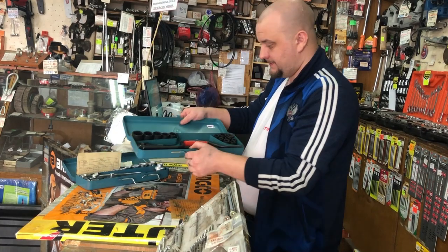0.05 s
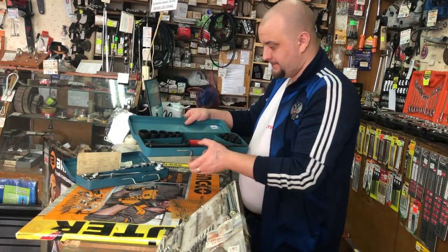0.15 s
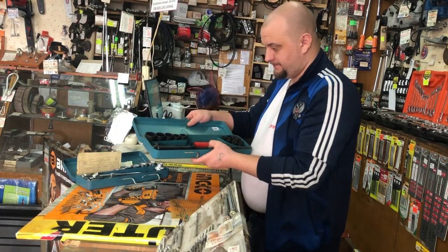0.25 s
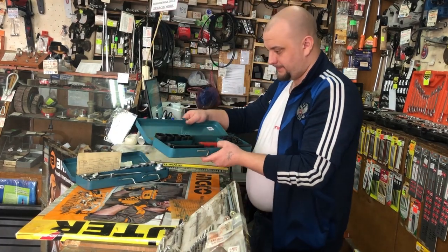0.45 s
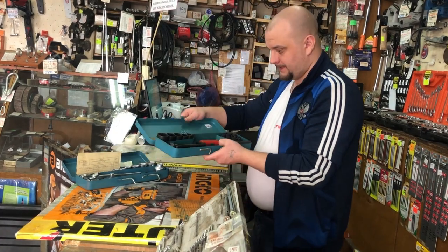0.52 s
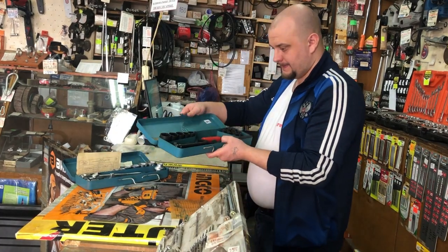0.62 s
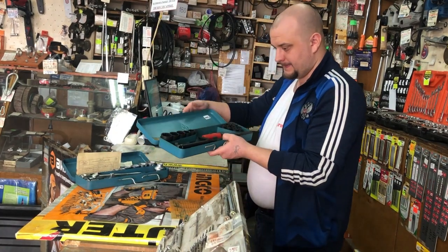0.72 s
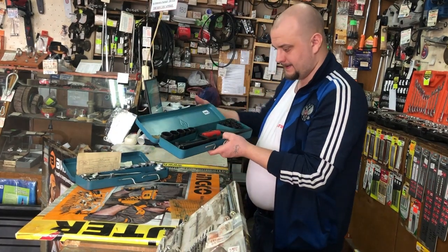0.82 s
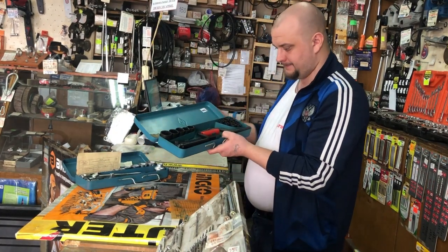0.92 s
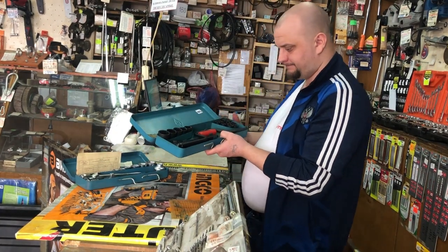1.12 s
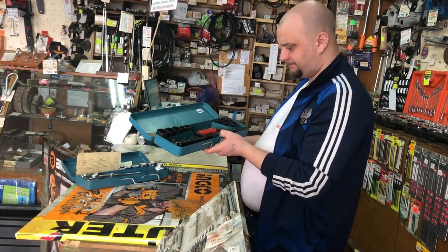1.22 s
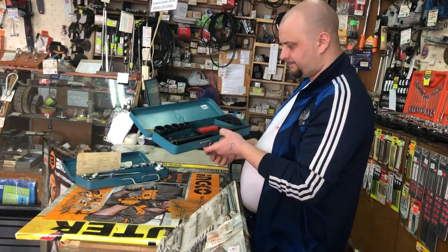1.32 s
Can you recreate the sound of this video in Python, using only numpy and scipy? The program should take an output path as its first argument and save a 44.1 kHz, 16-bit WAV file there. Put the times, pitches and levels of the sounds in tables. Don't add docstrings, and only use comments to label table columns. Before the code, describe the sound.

Loose steel tools snap sharply twice in a plastic case, ringing briefly through a small shop.

```python
import sys
import numpy as np
from scipy import signal
from scipy.fft import rfft, irfft
from scipy.io import wavfile
from scipy.ndimage import map_coordinates

SR = 44100
rng = np.random.default_rng(int(sys.argv[2]) if len(sys.argv) > 2 else 0)


def volts(x):
    e = np.asarray(x, float) / 20
    return 10 ** e


def unload_wav(signal):
    wavfile.write(
        sys.argv[1],
        SR,
        np.round(np.clip(np.atleast_2d(signal).T, -1, 1) * 32767).astype(np.int16),
    )


N = 59535

# pitch_hz, level_db (per Hz)
EARLIER_COLOUR = [(120, -35.5), (200, -14), (430, -4.5), (534, -15), (1130, -14.5), (1650, -7.5),
                  (1810, -13), (3750, -14), (15500, -38.5)]
EARLIER_DB, EARLIER_T60_SCALE = -48.5, 1.5
# pitch_hz, level_db (per Hz)
FLOOR_COLOUR = [(18, -30), (30, -8.5), (353, -4.5), (566, -12), (1120, -11.5), (1310, -16.5), (1990, -16),
                (3190, -21), (15800, -34)]
# time_s, level_db
BUSTLE = [
    (0.52, -61.5),
    (0.732, -62),
    (0.98, -65),
    (1.248, -67.5),
    (1.35, -71.5),
]
FLOOR_DB, BUSTLE_FULL_HZ, PATCHY_DB = -62, 1520, -1
# pitch_hz, level_db (rms), wobble_db
HUM = [(49.3, -70.5, -2.4), (99, -77.5, 4.5), (169.9, -73.5, 0), (236.7, -75.5, 1.5), (365.3, -74.5, 3.5),
       (398, -77.5, 1), (1137, -78.5, 3), (1980, -84.5, 5)]
# start_s, peak_db, pitch_hz, t60_s, click_db
TICKS = [(.02, -48, 530, .08, -70), (.107, -56, 4900, .01, -64), (.2196, -46, 4520, .018, -60),
         (.2915, -38, 4500, .014, -55), (.318, -39, 760, .04, -70), (.322, -46, 560, .09, -80),
         (.445, -54, 560, .06, -80), (.495, -57, 3300, .08, -80), (.622, -54, 1750, .04, -80),
         (.628, -58, 2750, .12, -80), (.744, -53, 2200, .02, -60), (.748, -51, 105, .14, -90),
         (.9205, -49, 3650, .007, -49), (.9212, -54, 7000, .009, -70), (.9895, -52, 4350, .008, -53),
         (.993, -56, 2050, .018, -70), (.996, -54, 1380, .022, -70), (1.274, -57, 950, .02, -62),
         (1.297, -64, 15400, .14, -60)]
# start_s, peak_db, chatter_s, tilt_db (per octave)
KNOCKS = [
    (.2194, -34, .0055, -0.7),
    (.2305, -39, .0045, -5.5),
    (.2913, -26, .0065, 2.8),
    (.617, -49.5, .016, -4),
]
# pitch_hz, level_db, t60_s
CASE_MODES = [(818, -15.5, 0.013), (1223, -2.5, 0.042), (1600, -7.5, .018), (1958, -0.1, .022),
              (2560, -5.5, 0.025), (3280, -7.5, .009), (4440, 0, 0.007), (6520, -8, 0.0066),
              (9380, -11.5, .005), (12400, -19, 0.0067), (14120, -17, 0.0047)]
# start_s, peak_db, chatter_s, tilt_db (per octave)
SNAPS = [
    (.2421, -17.5, .0032, -1.1),
    (.3011, -8, .0017, 1.76),
]
# pitch_hz, first_snap_db, second_snap_db, t60_s
STEEL_MODES = [(1328, -14, -13.5, 0.032), (2040, -10, -17, .02), (2930, -6, -6, 0.017),
               (3480, -1.5, -2.5, .014), (4500, -2, -15, .015), (5510, -4.5, -1, 0.0075),
               (6980, -2, -18.5, 0.0067), (9550, -5, -5.5, 0.017), (10100, 4, -7.5, 0.0099),
               (11500, -11.5, -6.5, .007), (12960, -8, 0, 0.01), (13860, -1, 0, 0.017),
               (15720, -3, -7, 0.033)]
TOUCHES, STRENGTH_SPREAD_DB, TOUCH_FADE_DB = 8, 1, 6.5
STEEL_CRACK_DB, CASE_CRACK_DB, CRACK_LOW_HZ, PUSH_DB = 4, -18.5, 810, 2.5
# pitch_hz, t60_s
ROOM_T60 = [(300, 0.37), (790, 0.59), (2090, 0.51), (5510, 0.38), (14600, 0.24)]
# pitch_hz, level_db
ROOM_COLOUR = [(150, -17.5), (400, 0.5), (1000, -1), (2500, -1.34), (5000, 1.6), (7800, -2), (12000, 6),
               (15500, -5)]
ROOM_DB, ROOM_RISE_S, EARLY_DB, EARLY_T60_S = -23, 0.0021, 0, 0.092
RING_IN_ROOM_DB, CASE_IN_ROOM_DB, TICKS_IN_ROOM_DB = -11, -8, -12
# start_s, level_db, t60_s, tilt_db (per octave)
RUBS = [
    (.7425, -56, .16, -4),
    (.768, -63, .2, -2.5),
    (.632, -64, .1, -4),
    (.987, -62, .1, -5),
]
# centre_s, all_kept_below_hz, then three kept bands, each kept_hz
THIN_MOMENTS = [(.086, 2700, 4650, 5300, 5300), (.513, 1450, 2400, 4250, 5500),
                (.619, 2250, 2800, 4650, 4650), (1.238, 1050, 1450, 2850, 4900),
                (1.346, 600, 1100, 1400, 1800)]
KEPT_HALF_WIDTH_HZ, KEPT_BOOST, LOST_SHARE = 150, .9, .9
MIC_LOW_HZ, CUTOFF_HZ = 36, 15750


def rms_one(x):
    return x / np.sqrt(np.mean(x ** 2) + 1e-20)


def at_hz(points, hz):
    pitch_hz, value = np.transpose(points)
    return np.interp(np.log(hz), np.log(pitch_hz), value)


def drift(rate):
    knots = rng.standard_normal(300)
    return map_coordinates(knots, [np.arange(N) / SR * rate], order=3)


def bands():
    edges = 28 * 2 ** np.arange(0, 9.4, 1 / 3)
    white = rng.standard_normal((2, N + 4000))
    out = []
    for k, (low, high) in enumerate(zip(edges, edges[1:])):
        band = signal.butter(2, [low, high], "band", fs=SR, output="sos")
        noise = signal.sosfilt(band, white[k % 2])
        out.append((np.sqrt(low * high), noise[4000:]))
    return out


def tilted(x, tilt_db, low_hz):
    hz = np.fft.rfftfreq(len(x), 1 / SR) + 1
    x = irfft(rfft(x) * volts(tilt_db * np.log2(hz / 4000)), len(x))
    return signal.sosfilt(signal.butter(2, low_hz, "high", fs=SR, output="sos"), x)


def earlier_clatter():
    t = np.arange(N) / SR
    parts = [(hz, noise * volts(at_hz(EARLIER_COLOUR, hz))) for hz, noise in bands()]
    scale = np.std(sum(noise for hz, noise in parts))
    tail = 0
    for hz, noise in parts:
        tail = tail + noise * volts(-60 * t / at_hz(ROOM_T60, hz) / EARLIER_T60_SCALE)
    return volts(EARLIER_DB) / scale * tail


def shop_floor():
    bustle = np.interp(np.arange(N) / SR, *np.transpose(BUSTLE))
    bustle = bustle - bustle.mean()
    tone = 0
    for hz, noise in bands():
        follow = min(1, hz / BUSTLE_FULL_HZ)
        tone = tone + noise * volts(at_hz(FLOOR_COLOUR, hz) + PATCHY_DB * drift(24) + bustle * follow)
    return volts(FLOOR_DB) * rms_one(tone)


def lamp_hum():
    t, out = np.arange(N) / SR, np.zeros(N)
    for hz, db, wobble_db in HUM:
        loudness = np.sqrt(2) * volts(db + wobble_db * drift(20))
        out += loudness * np.sin(2 * np.pi * (hz * t + rng.random()))
    return out


def ticks():
    t, out = np.arange(N) / SR, np.zeros(N)
    for s, db, hz, t60, click_db in TICKS:
        age = np.maximum(t - s, 0)
        out += volts(db - 60 * age / t60) * np.sin(2 * np.pi * hz * age)
        out[int(s * SR)] += volts(click_db)
    return out


def struck(hits, modes, crack_db):
    out, t = np.zeros((3, N + SR)), np.arange(SR // 5) / SR
    lead = 64
    for k, (s, db, chatter, tilt_db) in enumerate(hits):
        when = np.sort(rng.random(TOUCHES))
        chance = rng.standard_normal((len(modes) + 1, TOUCHES))
        at = ((when - when[0]) * chatter * SR).astype(int)

        crack = np.zeros(len(t) + lead)
        np.add.at(crack, at + lead, np.sign(chance[-1]) * volts(crack_db + STRENGTH_SPREAD_DB * chance[0]))
        crack = tilted(crack, tilt_db, CRACK_LOW_HZ)[-len(t):]
        blow = np.zeros(len(t) + lead)
        blow[lead] = 1
        push = tilted(blow, tilt_db, CRACK_LOW_HZ)[-len(t):]
        push = push * volts(PUSH_DB) * crack.std() / push.std()

        rings = np.zeros(len(t))
        for (hz, *levels_db, t60), c in zip(modes, chance):
            clicks = np.zeros(at[-1] + 1)
            np.add.at(clicks, at, volts(STRENGTH_SPREAD_DB * c - TOUCH_FADE_DB * when) * np.sign(c))
            one_ring = np.sin(2 * np.pi * hz * t) * volts(-60 * t / t60)
            ring = np.convolve(one_ring, clicks)[:len(t)]
            level_db = levels_db[k % len(levels_db)] + tilt_db * np.log2(hz / 4000)
            rings += ring / np.abs(ring).max() * volts(level_db)

        i = int(s * SR)
        peak = np.abs(rings + crack).max()
        out[:, i:i + len(t)] += volts(db) * np.array([rings, crack, push]) / peak
    return out[:, :N]


def case_knocks():
    return struck(KNOCKS, CASE_MODES, CASE_CRACK_DB)


def steel_snaps():
    return struck(SNAPS, STEEL_MODES, STEEL_CRACK_DB)


def room(x):
    t = np.arange(N) / SR
    tail = 0
    for hz, noise in bands():
        late = volts(-60 * t / at_hz(ROOM_T60, hz))
        early = volts(EARLY_DB - 60 * t / EARLY_T60_S)
        tail = tail + noise * volts(at_hz(ROOM_COLOUR, hz)) * (late + early)
    tail = tail * (1 - np.exp(-t / ROOM_RISE_S))
    return volts(ROOM_DB) * signal.fftconvolve(x, tail)[:N]


def rubs():
    t, out = np.arange(N) / SR, np.zeros(N)
    for s, db, t60, tilt_db in RUBS:
        age = np.maximum(t - s, 0)
        grains = rng.standard_normal(N) * volts(3.0 * drift(140))
        swell = volts(db - 60 * age / t60) * (1 - np.exp(-age / .002))
        out += rms_one(tilted(grains, tilt_db, 700)) * swell
    return out


def scene():
    steel_rings, steel_cracks, steel_push = steel_snaps()
    case_rings, case_cracks, case_push = case_knocks()
    small = ticks()
    into_room = steel_push + case_push + volts(RING_IN_ROOM_DB) * steel_rings
    into_room = into_room + volts(CASE_IN_ROOM_DB) * case_rings + volts(TICKS_IN_ROOM_DB) * small
    echo = room(into_room)
    direct = steel_rings + steel_cracks + case_rings + case_cracks + small + rubs()
    background = earlier_clatter() + shop_floor() + lamp_hum()
    return (direct + echo + background)[None]


def microphone(x):
    x = signal.sosfilt(signal.ellip(12, .5, 60, CUTOFF_HZ, fs=SR, output="sos"), x)
    return signal.sosfilt(signal.butter(4, MIC_LOW_HZ, "high", fs=SR, output="sos"), x)


def thinned(x):
    size = 2048
    out = np.pad(x, size)
    window = np.sin(np.pi * (np.arange(size) + .5) / size) ** 1.4
    hz = np.fft.rfftfreq(size, 1 / SR)
    for s, low_hz, *kept_hz in THIN_MOMENTS:
        i = int(s * SR) + size // 2
        kept = np.abs(hz[:, None] - kept_hz).min(axis=1) < KEPT_HALF_WIDTH_HZ
        lost = np.where(kept, -KEPT_BOOST, LOST_SHARE * (hz > low_hz))
        out[i:i + size] -= window * irfft(rfft(out[i:i + size] * window) * lost)
    return out[size:-size]


def band_limit(x):
    return signal.sosfilt(signal.butter(12, 17150, fs=SR, output="sos"), x)


def record(dry):
    mix = thinned(microphone(dry[0]))[None]
    return band_limit(mix)


dry = scene()
out = record(dry)
unload_wav(out)
```